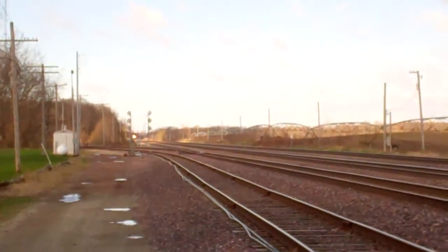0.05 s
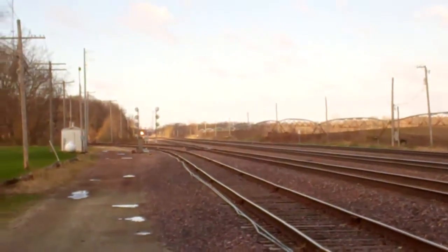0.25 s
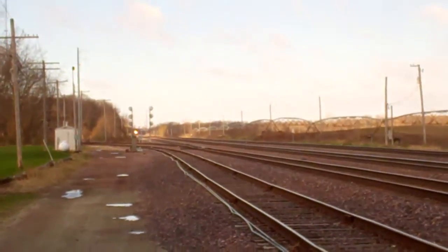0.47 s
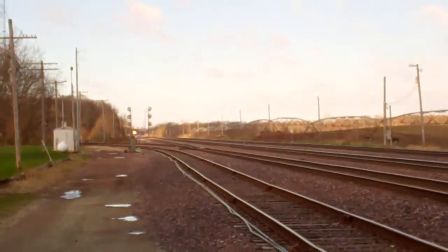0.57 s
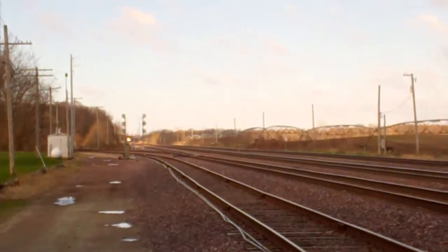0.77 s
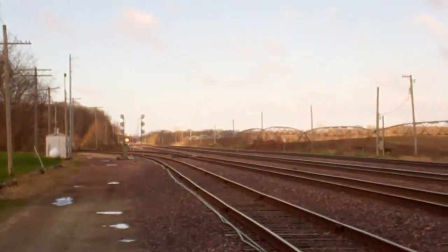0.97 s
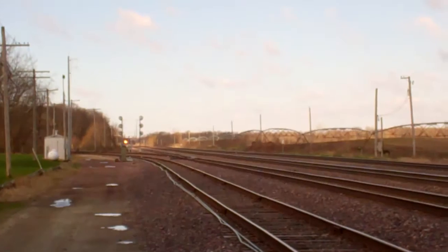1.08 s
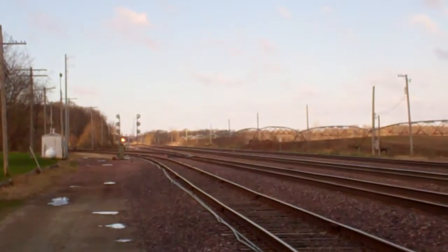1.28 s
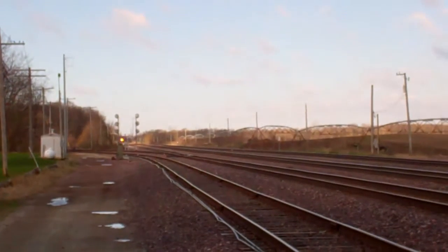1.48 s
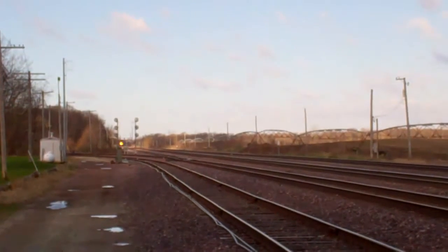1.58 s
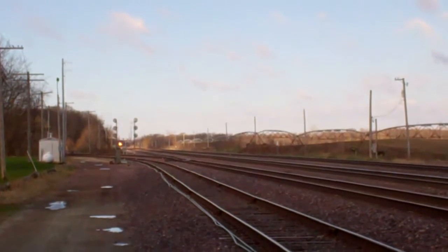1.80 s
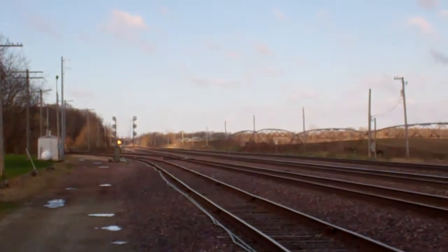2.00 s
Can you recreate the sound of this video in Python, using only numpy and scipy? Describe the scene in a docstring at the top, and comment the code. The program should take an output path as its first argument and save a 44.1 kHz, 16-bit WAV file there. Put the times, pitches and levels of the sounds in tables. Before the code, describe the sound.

Gusty wind beats on the microphone in open country, rumbling and roaring unevenly with soft thumps. Brief flutters come mostly from the left, while a smooth, distant rush of wind carries on underneath.

```python
"""Gusty wind beats on the two ports of a small microphone in open country.
Its eddies are pressure fluctuations that rumble, roar and thump at each port almost independently,
over a far, smooth rush of wind that both ports share. Brief flutters come mostly from the left
port, the strongest in the hardest gust. Peaks saturate softly; once the signal jumps with a tick."""
import sys
import numpy as np
from scipy import signal
from scipy.fft import rfft, irfft
from scipy.io import wavfile
from scipy.ndimage import uniform_filter1d

SR = 44100
rng = np.random.default_rng(int(sys.argv[2]) if len(sys.argv) > 2 else 0)


def wrap_up_sound(samples):
    """Save the sound to the file named by the first command line argument, as 16-bit audio."""
    columns = np.atleast_2d(samples).T
    # keep every value between -1 and 1, then stretch to whole-number steps
    tamed = np.clip(columns, -1, 1)
    steps = np.round(tamed * 32767).astype(np.int16)
    wavfile.write(sys.argv[1], SR, steps)


N = 90360


def amp(db):
    return 10 ** (np.asarray(db) / 20)


def unit_rms(x):
    return x / np.sqrt(np.mean(x ** 2, -1, keepdims=True) + 1e-20)


def spectrum_db(points, hz):
    """Spectral envelope: levels joined along a logarithmic frequency axis."""
    f, db = np.transpose(points)
    return np.interp(np.log(hz + 1), np.log(f + 1), db, left=db[0] - 20, right=-140)


def envelopes(table):
    """Temporal envelopes: each column after the time, interpolated to every sample."""
    times, *columns = np.transpose(table)
    return [np.interp(np.arange(N) / SR, times, column) for column in columns]


def port_gains(db, balance_db):
    """Level difference: half is added on the left, half taken off on the right."""
    return amp(np.array([db + balance_db / 2, db - balance_db / 2]))


def port_noise(spectrum, correlation):
    """Partial coherence: coloured noise at two ports with a component in common."""
    common, own = rng.standard_normal((2, N))
    pair = np.array([common, correlation * common + np.sqrt(1 - correlation ** 2) * own])
    gain = amp(spectrum_db(spectrum, np.fft.rfftfreq(N, 1 / SR)))
    return unit_rms(irfft(rfft(pair) * gain, N))


def steadied(x, amount=0.31, window_s=0.019):
    """Compression: dividing by a root of the running power partly evens out chance swells."""
    power = uniform_filter1d(x ** 2, round(window_s * SR))
    power = abs(uniform_filter1d(power, round(window_s * SR / 2)))
    return x / (power + 1e-9) ** (amount / 2)


def eddy_swells(low_hz, top_hz):
    """Turbulent fluctuation: a slow, band-limited random signal, independent at each port."""
    hz = np.fft.rfftfreq(N, 1 / SR)
    white = rfft(rng.standard_normal((2, N)))
    return unit_rms(irfft(white * (hz > low_hz) / (1 + (hz / top_hz) ** 4), N))


def buffeting():
    """Amplitude modulation by turbulence: gusts and eddies swell three noise bands together."""
    # Gust strength: (time [s], deep rumble [dB], upper rumble [dB], rumble left-right [dB],
    # roar [dB], roar left-right [dB])
    gusts = [(0.01, -36.5, -34.5, -1, -46.5, 2.5), (0.06, -33.5, -36.5, 5, -42, -1.5),
             (0.12, -40, -43, -1, -53.5, 7), (0.16, -37.5, -38, 7.5, -46, -6),
             (0.21, -46.5, -42, 3, -53, -2.5), (0.27, -39.5, -38, 2.5, -43.5, 5.5),
             (0.29, -42, -39.5, -2, -54, 2.5), (0.35, -43.5, -38, -3, -46.5, -1),
             (0.4, -34.5, -41, 4.0, -50.5, 2), (0.43, -30.5, -36.5, 0.5, -37, -2),
             (0.45, -41, -45, -2, -60, 1), (0.48, -33, -33, 4.5, -45.5, -3),
             (0.51, -40, -40, -3.5, -51.5, -1), (0.58, -42.5, -46, 10, -52.5, 0),
             (0.61, -40.5, -35, 1.5, -48.5, 2), (0.64, -32, -37, -0.5, -39, -2.5),
             (0.68, -45, -30.5, 1, -45.5, -1), (0.71, -31, -32, 9.5, -48, -9),
             (0.77, -28.5, -41.5, -7, -36, 4.5), (0.78, -37.5, -46, 5, -49, 5),
             (0.8, -54, -38, 0, -51.5, 14.5), (0.83, -45, -40, -4, -48.5, 19),
             (0.85, -41, -46.5, 5, -48, -2), (0.87, -34.5, -33, 3.5, -46.5, -7.5),
             (0.97, -42, -44, 0, -62, 10), (1.0, -36.5, -39.5, 5.0, -45, 2),
             (1.04, -44, -40.5, -3.5, -51, 12), (1.07, -37, -34, -3, -42.5, 3.5),
             (1.15, -33.5, -41, 3, -44.5, 2.5), (1.2, -33, -29.5, -5, -36, 3),
             (1.23, -42, -44, -1, -47.5, -0.5), (1.27, -43, -36.5, 0.5, -44, -2),
             (1.37, -35, -42, -2.5, -44, 2.0), (1.4, -27.5, -32, -1, -36, 5.5),
             (1.44, -37, -44.5, 0.5, -48, 5), (1.48, -43.5, -40, 7, -44, 6),
             (1.53, -40, -43.5, 3.0, -50.5, 1), (1.63, -37, -41.5, -1, -41.5, 10),
             (1.66, -39, -35, 4, -45.5, 4.5), (1.71, -27.5, -48, -5, -38, -3),
             (1.73, -39, -35, 0, -42, -8.5), (1.8, -34, -33.5, -5, -41.5, -1),
             (1.82, -41.5, -44.5, -3, -41.5, -8), (1.88, -40.5, -37.5, 6, -43.5, 7.5),
             (1.91, -36, -33.5, -4.5, -39, 5.5), (1.95, -29.5, -38, 4.0, -45, 3),
             (2.02, -38, -31.5, 0, -45, 6.5), (2.04, -34, -30, -1, -38, -2.5)]
    # Spectra of deep rumble, upper rumble and roar: (frequency [Hz], relative density [dB])
    deep_spectrum = [(8, -19), (14, -3.5), (37, -1), (70, -3), (95, -7), (140, -20.5), (250, -63)]
    upper_spectrum = [(40, -35), (70, -14.5), (100, -1.5), (170, -3.5), (260, -10), (400, -21.5),
                      (600, -36), (1000, -80)]
    roar_spectrum = [(120, -35), (220, -1.5), (300, -1), (500, -5), (800, -14.5), (1200, -21),
                     (2000, -34.5), (4000, -51)]
    deep_db, upper_db, rumble_balance, roar_db, roar_balance = envelopes(gusts)
    swell_db = 2.5 * eddy_swells(low_hz=8, top_hz=42.7)
    deep = steadied(port_noise(deep_spectrum, correlation=0.36)) * amp(0.56 * swell_db)
    upper = steadied(port_noise(upper_spectrum, correlation=0.057)) * amp(swell_db)
    roar = port_noise(roar_spectrum, correlation=0.027) * amp(0.96 * swell_db)
    return (unit_rms(deep) * port_gains(deep_db + 2, rumble_balance)
            + unit_rms(upper) * port_gains(upper_db + 1, rumble_balance)
            + unit_rms(roar) * port_gains(roar_db + 2.5, roar_balance))


def far_rush(left_lead_s=.00009, patch_db=0.84, gain_db=16.5):
    """Coherence of a far source: both ports hear nearly the same lows, the left slightly earlier."""
    # Level of the background hiss, which ducks after the hardest gust as the recorder's gain drops,
    # then recovers: (time [s], relative level [dB])
    levels = [(0, -72.5), (.2, -69.5), (.42, -67.5), (.57, -67.5), (.63, -65), (.765, -63.5), (.778, -71.5),
              (.85, -74.5), (1.0, -71.5), (1.05, -68.5), (1.16, -67), (1.36, -66), (1.42, -64.5),
              (1.435, -67.5), (1.56, -67.5), (1.66, -64), (1.8, -61.5), (1.9, -61.5), (2.05, -59.5)]
    # Spectrum of the hiss, band-limited near 12.5 kHz: (frequency [Hz], relative density [dB])
    spectrum = [(290, -28), (500, -11), (550, -8.5), (1000, -12.5), (1100, -13), (1450, -13), (1900, -13),
                (3470, -17), (6410, -30), (9780, -38.5), (12200, -51), (13000, -79)]
    # Level difference between the ports: (frequency [Hz], left-right [dB])
    balance = [(500, -0.5), (3000, 0.5), (5000, 2), (12000, 3.5)]
    # Likeness of the ports: (frequency [Hz], correlation [0-1])
    coherence = [(500, 1), (1500, 0.94), (3000, 0.48), (6000, 0.53), (12000, 0.25)]
    frames, hz = N // 128 + 5, np.fft.rfftfreq(512, 1 / SR)
    common_re, common_im, own_re, own_im, patches = rng.standard_normal((frames, 257, 5)).T
    correlation = np.interp(hz, *np.transpose(coherence))[:, None]
    right = common_re + 1j * common_im
    left = correlation * right + np.sqrt(1 - correlation ** 2) * (own_re + 1j * own_im)
    left *= np.exp(2j * np.pi * hz * left_lead_s)[:, None]
    gains = port_gains(spectrum_db(spectrum, hz), np.interp(hz, *np.transpose(balance)))
    spectra = np.array([left, right]) * gains[:, :, None]
    # faint louder and softer patches in frequency and time
    patches = uniform_filter1d(uniform_filter1d(patches, size=10, axis=0), size=12, axis=1)
    spectra *= amp(patch_db * patches / patches.std())
    hiss = signal.istft(spectra, nperseg=512, noverlap=384)[1][:, :N]
    return hiss / hiss.std() * amp(envelopes(levels)[0] + gain_db)


def thumps(half_width_cycles=0.39):
    """Pressure pulses: an eddy gives a port about one swing, pushing or pulling by chance."""
    # Single eddies: (time [s], envelope peak [dB], frequency [Hz], port [0 left, 1 right])
    eddies = [(0.019, -21.5, 140, 1), (0.057, -21, 190, 0), (0.272, -22, 130, 0), (0.423, -15, 184, 1),
              (0.424, -22.5, 258, 0), (0.476, -24.5, 130, 0), (0.613, -23.5, 138, 1),
              (0.619, -20.5, 133, 0), (0.698, -27, 130, 0), (0.699, -19, 140, 1), (0.733, -18, 120, 0),
              (0.76, -13, 180, 1), (0.764, -10, 307, 0), (1.123, -18.5, 127, 0), (1.196, -15, 128, 0),
              (1.203, -15, 206, 1), (1.388, -15, 148, 0), (1.398, -15.5, 120, 1), (1.416, -20.5, 120, 1),
              (1.429, -22.5, 160, 0), (1.703, -18, 110, 0), (1.722, -20, 228, 1), (1.745, -19, 121, 1),
              (1.782, -13.5, 110, 0), (1.785, -18.2, 140, 1), (1.806, -18, 80, 1), (1.873, -26, 280, 0),
              (1.891, -25, 80, 0), (1.929, -24, 121, 1), (2.019, -18, 128, 1), (2.027, -18, 135, 0)]
    out, t = np.zeros((2, N)), np.arange(N) / SR
    for time_s, db, hz, port in eddies:
        cycles = (t - time_s) * hz
        envelope = amp(db) * np.exp(-(cycles / half_width_cycles) ** 2)
        out[port] += envelope * np.cos(2 * np.pi * cycles + rng.uniform(0, 2 * np.pi))
    return out


def flutters(size=2048):
    """Windowed noise: wind flutters in one port as a short burst under a raised-cosine envelope."""
    # Flutters: (mid time [s], duration [s], level [dB], centre frequency [Hz], port [0 left, 1 right])
    bursts = [(0.058, .012, -32.5, 526, 0), (0.161, 0.017, -35.5, 590, 0), (0.273, 0.015, -42, 450, 0),
              (.345, 0.0065, -38, 550, 0), (.425, 0.019, -35.5, 350, 1), (.731, 0.0075, -37, 704, 0),
              (0.75, 0.009, -40, 1300, 1), (0.765, 0.012, -23.5, 1600, 0), (0.792, .012, -41.5, 1500, 0),
              (.835, 0.0086, -44, 1000, 0), (1.161, 0.0077, -39.5, 1500, 0), (1.202, 0.014, -40.5, 1200, 0),
              (1.307, .008, -40, 1200, 0), (1.315, .006, -47, 1500, 0), (1.391, 0.011, -29, 596, 0),
              (1.409, 0.011, -36, 800, 0), (1.875, 0.011, -33, 790, 0)]
    # Spectrum of a flutter: (frequency [multiple of the centre], relative density [dB])
    shape = [(.2, -12), (.55, 2), (1, -1), (1.5, -5), (2.4, -16), (4, -36), (6.5, -58)]
    out = np.zeros((2, N))
    t, hz = (np.arange(size) - size / 2) / SR, np.fft.rfftfreq(size, 1 / SR)
    for mid_s, duration_s, db, centre_hz, port in bursts:
        spectrum = [(ratio * centre_hz, level) for ratio, level in shape]
        burst = unit_rms(irfft(rfft(rng.standard_normal(size)) * amp(spectrum_db(spectrum, hz))))
        burst *= np.cos(np.pi * np.clip(t / duration_s, -.5, .5)) ** 2
        mid_power = (burst ** 2).sum() / (duration_s * SR) * 8 / 3  # the window's mean square is 3/8
        start = round(mid_s * SR) - size // 2
        out[port, start:start + size] += amp(db) * burst / np.sqrt(mid_power)
    return out


def tick(time_s=1.4233, settle_s=.003, left_db=-27, right_db=-21.5):
    """A discontinuity is broadband: the signal dips, jumps upward and settles exponentially."""
    t = np.arange(N) / SR - time_s
    jump = np.sign(t) * np.exp(-abs(t) / settle_s) / 2
    return amp([left_db, right_db])[:, None] * jump


def scene():
    """Superposition: the pressures of near and far wind add at each port."""
    return buffeting() + far_rush() + thumps() + flutters()


def record(dry, ceiling=.35, cutoff_hz=16350):
    """Saturation in the microphone rounds the peaks; the tick is added and a low-pass limits the band."""
    saturated = ceiling * np.tanh(dry / ceiling)
    low_pass = signal.firwin(511, cutoff_hz, window=("kaiser", 9), fs=SR)
    return signal.oaconvolve(saturated + tick(), low_pass[None], "same")


dry = scene()
out = record(dry)
wrap_up_sound(out)
```